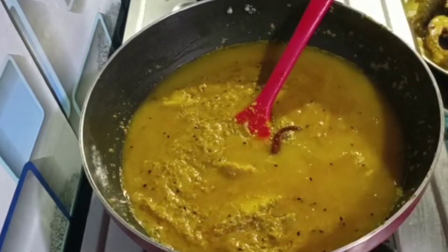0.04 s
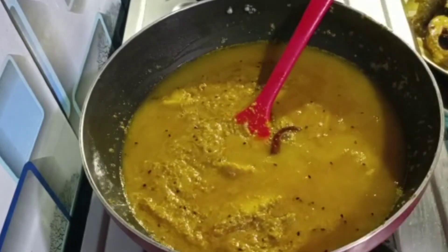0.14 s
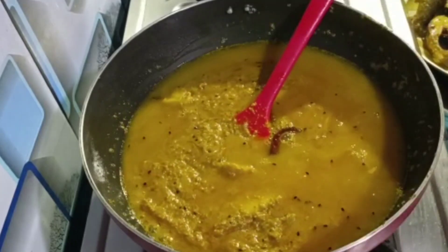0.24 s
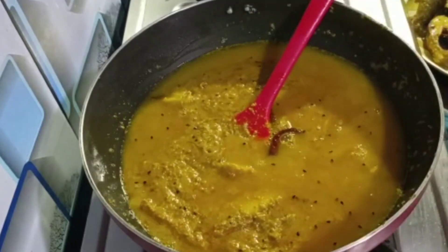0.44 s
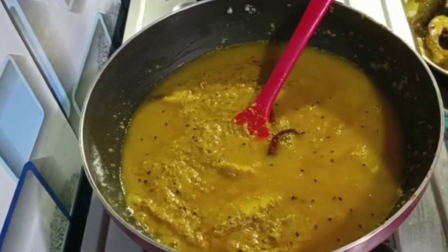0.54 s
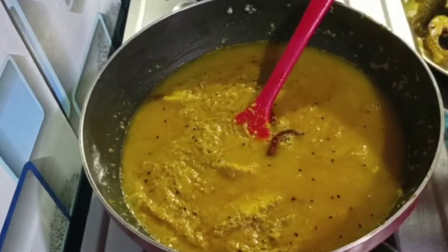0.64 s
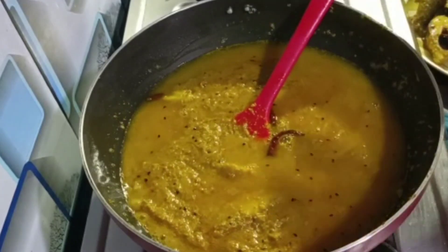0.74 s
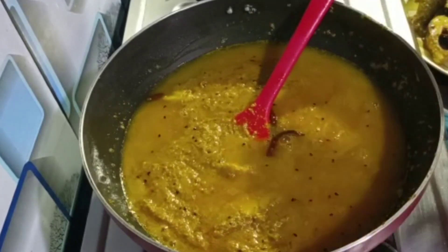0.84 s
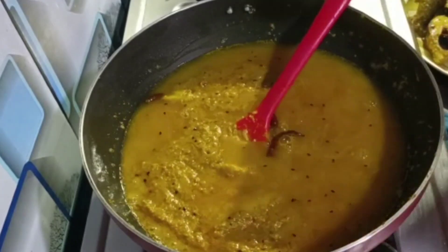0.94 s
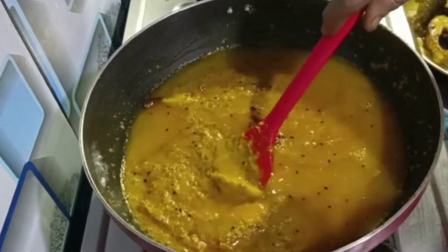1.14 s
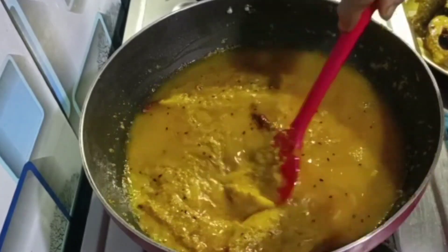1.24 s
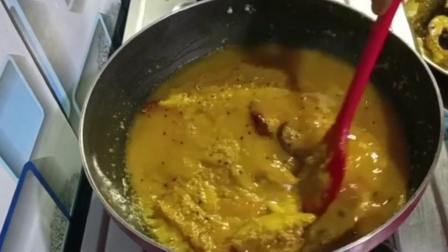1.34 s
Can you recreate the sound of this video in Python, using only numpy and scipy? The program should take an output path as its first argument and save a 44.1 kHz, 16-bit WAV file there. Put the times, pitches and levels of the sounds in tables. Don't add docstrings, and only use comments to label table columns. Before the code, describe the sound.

A steel jug clanks loudly onto a counter at 0.22 seconds, ringing brightly, its loose handle rattling through small bounces until 0.33, then damped by a hand. A tiny drip sounds at 0.44. A duller, lower knock lands at 0.50 and dies by 0.7. Thin paste fizz with sparse pops continues throughout, fading slightly; from 0.75 to 1.2 a spatula faintly rubs and rocks the pan. Close stereo, low kitchen hum.

```python
import sys
import numpy as np
from scipy import signal
from scipy.fft import rfft, irfft
from scipy.io import wavfile
from scipy.ndimage import uniform_filter1d

SR = 44100
rng = np.random.default_rng(int(sys.argv[2]) if len(sys.argv) > 2 else 0)


def int16_out(signal):
    q = np.round(np.clip(np.atleast_2d(signal).T, -1, 1) * 32767)
    wavfile.write(sys.argv[1], SR, q.astype(np.int16))


def nominal_scale(level):
    x = np.asarray(level, float) / 20
    return 10 ** x


N = 61739
T = np.arange(N) / SR

# time in seconds, level in dB.
FIZZ_LEVEL = [(0, -50.5), (.1, -54.5), (.2, -54.5), (.35, -52.5), (.48, -57), (.6, -58), (.67, -62.5),
              (.7, -55.5), (.85, -55), (.95, -57), (1.06, -58), (1.12, -59.5), (1.3, -59), (1.4, -60.5)]


def rms_one(x):
    return x / np.sqrt(np.mean(x ** 2) + 1e-20)


def in_time(rows):
    s, *columns = np.transpose(rows)
    return [np.interp(T, s, column) for column in columns]


def at_hz(points, hz):
    point_hz, db = np.transpose(points)
    return np.interp(np.log(hz + 1), np.log(point_hz), db)


def during(rows):
    first_s, last_s = rows[0][0], rows[-1][0]
    return (T > first_s) * np.clip((last_s + 0.075 - T) / 0.02, 0, 1)


def drift(rate):
    knots = rng.standard_normal(N // 40 + 2002)
    r = np.exp(-80 * np.pi * rate / SR)
    slow = signal.lfilter([1], [1, -2 * r, r * r], knots)[2000:]
    return np.interp(np.arange(N) / 40, np.arange(len(slow)), rms_one(slow))


def colour(white, spectrum, lines_db=0):
    # frequency in Hz, correlation from -1 to 1.
    likeness = [(60, .8), (270, .7), (740, .4), (1220, -.15), (2000, .05), (16000, .01)]
    hz = np.fft.rfftfreq(N, 1 / SR)
    low_hz, high_hz = spectrum[0][0], spectrum[-1][0]
    ends = np.minimum(1, hz / low_hz) ** 8 / np.maximum(1, hz / high_hz) ** 30
    uneven = uniform_filter1d(rng.standard_normal(len(hz)), size=120)
    lines = lines_db * rms_one(uniform_filter1d(uneven, size=120))
    alike = np.clip(at_hz(likeness, hz), -1, 1)
    mid, side = rfft(white)
    both = np.sqrt(1 + alike) * mid + np.sqrt(1 - alike) * side * [[1], [-1]]
    return rms_one(irfft(both * nominal_scale(at_hz(spectrum, hz) + lines) * ends, N))


def patches(x, low_hz, patchy_db, rate):
    edges = low_hz * 2 ** np.arange(0, np.log2(20000 / low_hz), 1 / 3)
    total = 0
    for k, pair in enumerate(zip(edges, edges[1:])):
        band = signal.sosfilt(signal.butter(2, pair, "band", fs=SR, output="sos"), x)
        swell_db = patchy_db * (drift(rate) + 1.34 * drift(5.4))
        total = total + (-1) ** k * nominal_scale(swell_db) * band
    return rms_one(total)


def resonate(x, tones):
    out = 0
    for hz, width, db in tones:
        r = np.exp(-np.pi * width / SR)
        poles = [1, -2 * r * np.cos(2 * np.pi * hz / SR), r * r]
        out = out + nominal_scale(db) * rms_one(signal.lfilter([1, 0, -1], poles, x))
    return rms_one(out)


def clicks(s, db):
    out = np.full(N, 1e-18)
    out[(np.asarray(s) * SR).astype(int)] = nominal_scale(db)
    return out


def ring(strikes, modes, rise_s):
    out = np.zeros((2, N))
    rise = np.exp(-1 / (rise_s * SR))
    sides = np.array([[.5], [-.5]])
    for hz, db, t60, pan_db, lead in modes:
        turn = np.exp(2j * np.pi * hz / SR)
        poles = np.convolve([1, -nominal_scale(-60 / (t60 * SR)) * turn], [1, -rise * turn])
        tone = signal.lfilter([nominal_scale(db) * (1 - rise)], poles, strikes)
        side_level = nominal_scale(pan_db * sides + 1.5 * drift(56))
        out += np.imag(tone * side_level * np.exp(1j * lead * sides))
    return out


def dying(strikes, t60):
    rise = np.exp(-1 / (0.0012 * SR))
    poles = np.convolve([1, -nominal_scale(-120 / (t60 * SR))], [1, -rise])
    return np.sqrt(signal.lfilter([1 - rise], poles, strikes ** 2))


def jug():
    # time in seconds, then counter, wall, rim and crack levels in dB.
    touches = [(0.2229, -46, -35.5, -49, -58), (0.226, -33.5, -23, -35.5, -27),
               (.2325, -27, -27.5, -36.5, -33), (.2400, -46, -40.5, -34.5, -39),
               (.2680, -33, -30, -34, -38.5), (.2870, -32.5, -35.5, -28.5, -41.5),
               (.4930, -34, -48.5, -81.5, -40), (0.5006, -23, -44, -90, -63),
               (.5030, -34.5, -41.5, -87, -32.5), (.5170, -27.5, -40.5, -105, -44),
               (.5330, -35, -48, -89, -44), (.5680, -35.5, -53, -81, -55)]
    # start in seconds, fade in dB per second, depth in dB,
    # later fade in dB per second.
    grips = [
        (.350, 300, 11, 60),
        (.645, 450, 13, 60),
    ]
    # frequency in Hz, level in dB, t60 in seconds,
    # left-right level in dB, left lead in radians.
    empty_wall = [(417, -17, 0.1, -17, .3), (519.9, -10, 0.28, -8.5, .5), (721.6, -4, 0.12, -1, 0.43),
                  (869, -8.5, 0.096, -13, 2), (1088, -3.5, 0.56, -12, 1.77), (1358, -6.5, 0.11, -7, 2.1),
                  (1480, -5.5, 0.14, -8.5, 1.8), (2216, -14.5, .18, -11, 1.2), (2800, -13, 0.61, -10, 3.2),
                  (3110, -18.5, 0.25, 0.5, 1.2), (3234, -10, 0.12, 8, 2), (3490, -11.5, 0.16, 7.5, 0.15),
                  (3600, -16, 0.33, -5, 1.4), (3900, -22, 0.27, 2, 1.1)]
    full_wall = [(455, -6.5, 0.095, 3, .6), (582.4, -0.5, 0.32, 4, 1.4), (695, 2, 0.24, -2.5, 1.86),
                 (913, -1, 0.064, 4.5, 2), (1069, 0, 0.11, 7.5, 2.16), (1486, -4.5, 0.13, -2, 1.7),
                 (1572, -2.5, 0.1, 2, 2.34), (2218, -13.5, 0.15, 2.5, 1.8), (3100, -16, .08, 1.5, 1.2),
                 (3478, -1, 0.081, -5, .6), (3763, -9.5, .12, -2.5, 1.1)]
    # frequency in Hz, level in dB per Hz.
    clank_noise = [(300, -1.5), (1200, 5), (1850, -15.5), (3300, -12), (4300, -6.5), (6200, -18.5),
                   (8300, -20), (15600, -8.5)]
    # frequency in Hz, level in dB per Hz.
    knock_noise = [(400, 1.5), (1600, -16), (2100, -29.5), (3500, -27.5), (5400, -8), (8000, -25),
                   (11000, -6.5), (15600, -18.5)]
    let_go_s = .45
    first = [row for row in touches if row[0] < let_go_s]
    second = [row for row in touches if row[0] > let_go_s]
    clank = set_down(first, empty_wall, clank_noise, 0.45, grips[0])
    knock = set_down(second, full_wall, knock_noise, 0.26, grips[1])
    return clank + knock + handle() + drip()


def set_down(touches, wall_modes, noise_spectrum, tail_t60, grip):
    # frequency in Hz, level in dB, t60 in seconds, left-right level in dB,
    # left lead in radians.
    counter_modes = [(119, -6, 0.62, -3, 0.065), (137.77, -5, 0.91, -2.5, 0.087),
                     (190.9, -12.5, 0.32, -3, 0.077), (236.3, -4, 0.16, -1, 0.15),
                     (270.06, 2.5, 0.59, -5.5, 0.3), (382, -41, 0.21, -2.5, 0.26),
                     (519, -23.5, 0.13, -21, 0.88)]
    rim_modes = [(1406, -4.5, 0.95, -0.5, 2.2), (1573, -12, 1, -1, 2.18), (2059, -12, 0.61, -9.5, 1.1),
                 (2324, -2, 0.49, 5, 1.2), (3496, 1, 0.64, -9.5, 0.17)]
    s, counter_db, wall_db, rim_db, crack_db = np.transpose(touches)
    rings = ring(clicks(s, counter_db), counter_modes, rise_s=0.00051)
    rings += ring(clicks(s, rim_db), rim_modes, rise_s=0.0039)
    walls = ring(clicks(s, wall_db), wall_modes, rise_s=0.00049)

    hits = clicks(s, crack_db)
    noise = colour(rng.standard_normal((2, N)), noise_spectrum, lines_db=4.0)
    dull = signal.lfilter(*signal.butter(2, 5160, fs=SR), noise)
    crack = dying(hits, 0.1) * noise + nominal_scale(-2.5) * dying(hits, tail_t60) * dull

    at, rate, depth, after = grip
    choke_db = np.clip((T - at) * rate, 0, depth) + after * np.maximum(T - at, 0)
    return rings * nominal_scale(-choke_db) + walls * nominal_scale(-0.2 * choke_db) + crack * nominal_scale(-.5 * choke_db)


def handle():
    # time in seconds, level in dB, treble tilt in dB per octave.
    rattles = [
        (.2255, -31, -2.5),
        (.2330, -33.5, 0.1),
        (.2480, -38.5, 3.5),
        (.2580, -37.5, 0),
        (.2730, -43, 3),
        (.3110, -42.5, 10),
        (.3300, -43, 2.5),
        (.5030, -38.5, 7.5),
    ]
    # frequency in Hz, level in dB, t60 in seconds, left-right level in dB,
    # left lead in radians.
    handle_modes = [(4220, -5, .08, 6, 1.4), (4720, 2, 0.095, 14.5, 1.53), (5450, -10, 0.073, 16, 1.3),
                    (6070, 1.5, 0.084, 19.5, 0.59), (6270, -8.5, .07, 9.5, 1.1), (6850, -11, .08, 10, 1.9),
                    (7460, -17, 0.11, 12.5, 1.1), (7560, -25.5, 0.12, 3, 1.3),
                    (9120, -23.5, 0.053, -5, 1.1), (9350, -18.5, 0.079, 2, 1.11),
                    (9350, -16, 0.082, 2.5, 1.1), (9830, -11.5, 0.075, 1, 1.1),
                    (10450, -26.5, .07, -3, 1.2), (11520, -16.5, 0.055, 2, 1.2)]
    s, db, tilt_db = np.transpose(rattles)
    out = 0
    for mode in handle_modes:
        uneven_db = 2.7 * rng.standard_normal(len(s))
        strikes = clicks(s, db + tilt_db * np.log2(mode[0] / 6000) + uneven_db)
        out = out + ring(strikes, [mode], rise_s=0.00049)
    return out


def drip():
    # time in seconds, frequency in Hz, level in dB, t60 in seconds.
    drop_tone = (.440, 988, -41, 0.24)
    at, hz, db, t60 = drop_tone
    return ring(clicks([at], db), [(hz, 0, t60, -3, 1.0)], rise_s=0.0026)


def fizz():
    # frequency in Hz, level in dB per Hz.
    burst_spectrum = [(2760, -25), (4700, -12.5), (5400, 3.5), (7530, -5), (9490, -1), (10700, -3),
                      (15000, -8), (16000, -18)]
    # time in seconds, peak level in dB.
    lone_pops = [
        (0.1946, -51),
        (0.3114, -39),
        (0.6816, -46.5),
        (0.721, -45.5),
        (0.949, -46),
        (1.0545, -45),
        (1.1418, -44),
        (1.2494, -72),
        (1.3324, -45),
    ]
    bursts_per_s = 4400
    sizes = nominal_scale(1.7 * np.minimum(rng.exponential(1, (2, N)), 5)) * rng.standard_normal((2, N))
    bursts = sizes * (rng.random((2, N)) < bursts_per_s / SR)
    grains = patches(colour(bursts, burst_spectrum), 4010, patchy_db=1.5, rate=41)
    s, db = np.transpose(lone_pops)
    pops = dying(clicks(s, db - 5.5), t60=.05) * colour(rng.standard_normal((2, N)), burst_spectrum)
    return nominal_scale(in_time(FIZZ_LEVEL)[0]) * grains + pops


def spatula():
    return rim_rub() + rocking_pan() + swishes()


def rim_rub():
    # time in seconds, level in dB.
    rub_level = [
        (0.7, -86),
        (0.758, -68),
        (0.866, -81),
        (0.926, -59.5),
        (0.942, -61),
        (0.988, -49.5),
        (1.036, -65),
        (1.066, -50),
        (1.2, -88),
    ]
    # frequency in Hz, width in Hz, level in dB.
    rub_tones = [(1340, 23, -60), (1292, 12.3, 6), (1378, 108, 10.5), (2225, 360, -5)]
    rub = resonate(resonate(rng.standard_normal(N), rub_tones), rub_tones)
    ports = np.array([np.roll(rub, 12) * nominal_scale(12.5), rub * nominal_scale(15.0)])
    return ports * nominal_scale(in_time(rub_level)[0] - 2.5) * during(rub_level)


def rocking_pan():
    # time in seconds, level in dB, frequency in Hz.
    rock = [
        (0.7, -96, 442),
        (0.75, -59.5, 433.4),
        (0.808, -67.5, 464),
        (0.894, -58, 510),
        (0.96, -83, 431),
    ]
    # time in seconds, level in dB, frequency in Hz.
    thumps = [(.72, -64.5, 118.2), (.765, -48, 117.3), (.825, -56, 103.4), (.88, -45, 113.9),
              (.925, -53.5, 92), (.975, -55.5, 79), (1.02, -72, 79.4), (1.1, -62, 74.8), (1.17, -60, 90),
              (1.22, -85.5, 95.4), (1.37, -68, 98.9), (1.4, -73, 98)]
    # frequency in Hz, width in Hz, level in dB.
    rumble_tones = [(50, 37, 9), (101, 62, 3.5), (191, 26, -13.5)]
    hollow_db, hollow_hz = in_time(rock)
    hollow_phase = 2 * np.pi * np.cumsum(hollow_hz + 14 * drift(64)) / SR
    hollow = np.sqrt(2) * np.sin(hollow_phase) * nominal_scale(hollow_db + 3.8 * drift(29))

    thump_db, thump_hz = in_time(thumps)
    sway = np.sqrt(2) * np.sin(2 * np.pi * np.cumsum(thump_hz) / SR)
    rumble = resonate(resonate(rng.standard_normal(N), rumble_tones), [(90, 105, 0)])
    thump = nominal_scale(thump_db) * (sway + nominal_scale(-4) * rumble)
    return thump * during(thumps) + hollow * during(rock)


def swishes():
    # centre in seconds, length in seconds, level in dB.
    puffs = [
        (.84, .03, -61),
        (1.04, .035, -58),
        (1.21, .025, -63),
        (.6, .03, -60),
    ]
    puff_hz = [14000, 15000, 15000, 5800]
    white = rng.standard_normal((2, N))
    out = 0
    for (s, length, db), hz in zip(puffs, puff_hz):
        hiss = resonate(white, [(hz, 0.1 * hz, 0)])
        out = out + nominal_scale(db) * np.exp(-((T - s) / length) ** 2) * hiss
    return out


def kitchen_hum():
    # frequency in Hz, level in dB per Hz.
    hum_spectrum = [(30, 0.5), (80, 0), (192, -12.5), (400, -16), (950, -20), (1340, -9.5), (3000, -12.5),
                    (4400, -17)]
    noise = colour(rng.standard_normal((2, N)), hum_spectrum)
    hum = patches(noise, 27.47, patchy_db=3, rate=2.86)
    fizz_db, = in_time(FIZZ_LEVEL)
    hum_db = -60.5 + 0.17 * (fizz_db - fizz_db.mean())
    mains = nominal_scale(-75.5) * np.sin(2 * np.pi * 201 * T)
    return nominal_scale(hum_db) * hum + mains


def scene():
    rumble_cut = signal.butter(2, 122, "high", fs=SR, output="sos")
    return signal.sosfilt(rumble_cut, jug() + fizz() + spatula() + kitchen_hum())


def low_pass(x):
    return signal.sosfilt(signal.butter(12, 16860, fs=SR, output="sos"), x)


def record(dry):
    # frequency in Hz, left over right level in dB.
    port_lean = [(3200, 2.5), (4400, -8.5), (5500, -22), (7000, -33), (8000, -2.5), (9300, 41.5),
                 (11000, 7), (15500, 7)]
    # frequency in Hz, level in dB.
    overall_tone = [(3600, -0.5), (4100, -2.5), (4700, -3), (5100, -0.5), (15400, 3.5), (16300, -33)]
    hz = np.fft.rfftfreq(N, 1 / SR)
    lean = nominal_scale(at_hz(port_lean, hz)) ** 2
    power = 2 * np.array([lean, np.ones_like(lean)]) / (1 + lean)
    ports = np.sqrt(power) * nominal_scale(at_hz(overall_tone, hz))
    mix = irfft(rfft(dry) * ports, N)
    return low_pass(mix)


dry = scene()
out = record(dry)
int16_out(out)
```